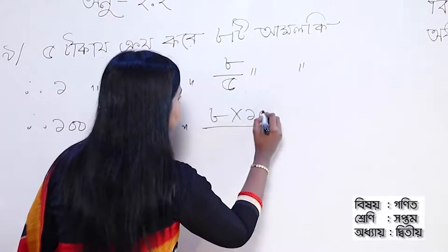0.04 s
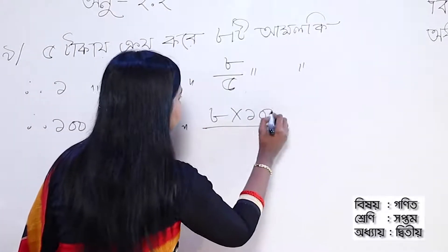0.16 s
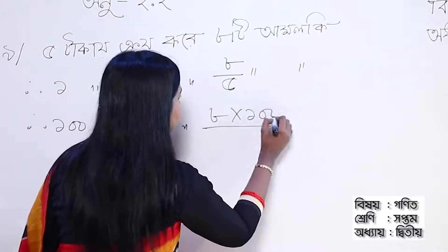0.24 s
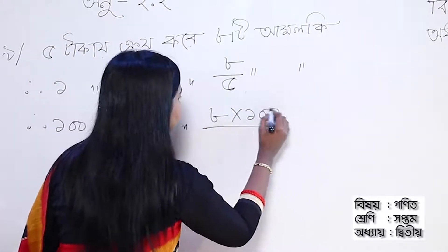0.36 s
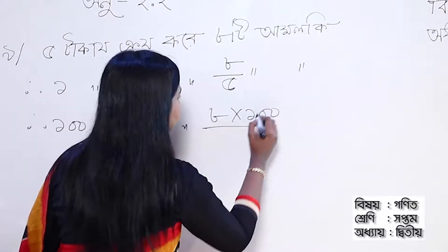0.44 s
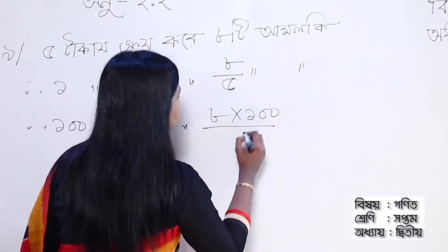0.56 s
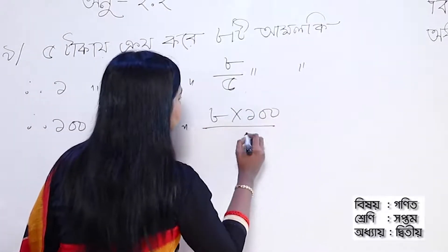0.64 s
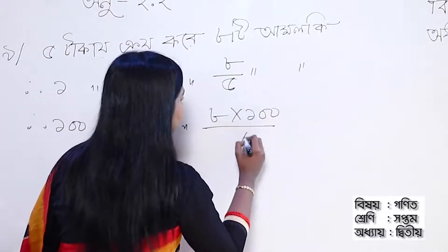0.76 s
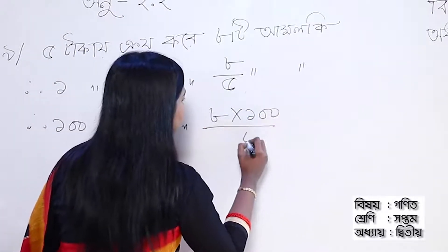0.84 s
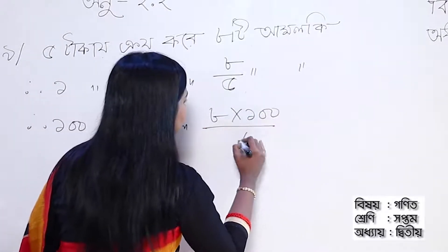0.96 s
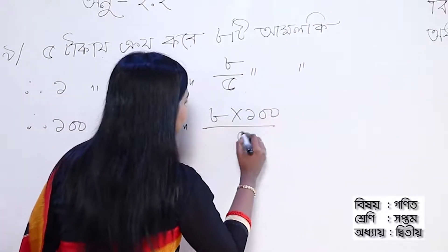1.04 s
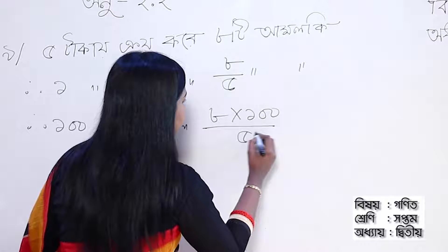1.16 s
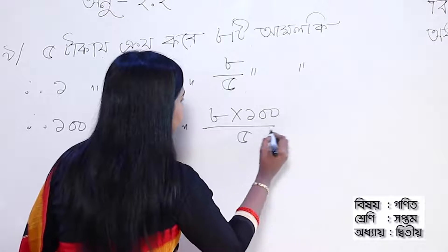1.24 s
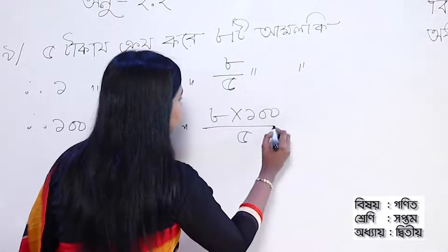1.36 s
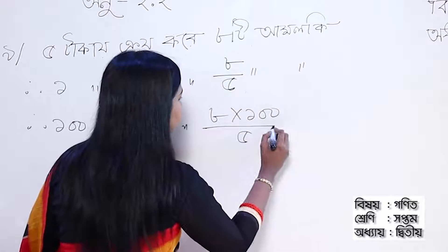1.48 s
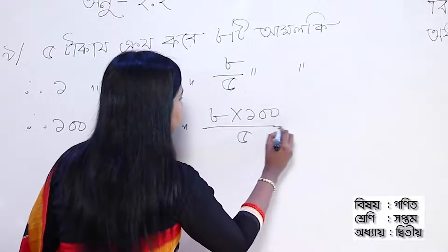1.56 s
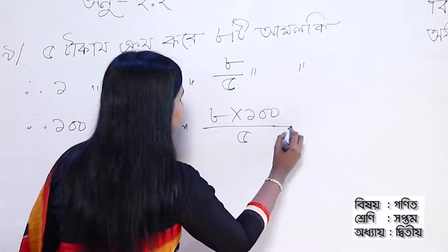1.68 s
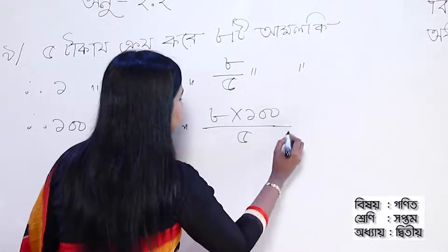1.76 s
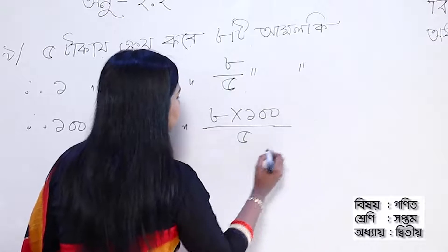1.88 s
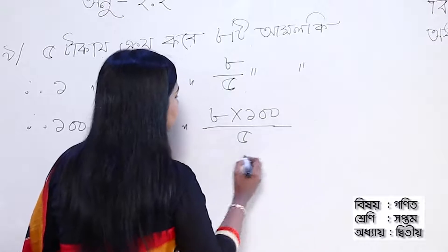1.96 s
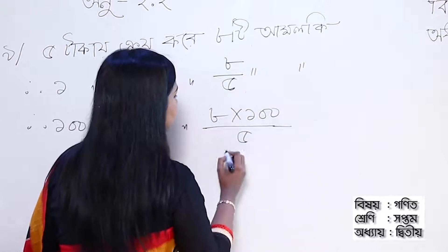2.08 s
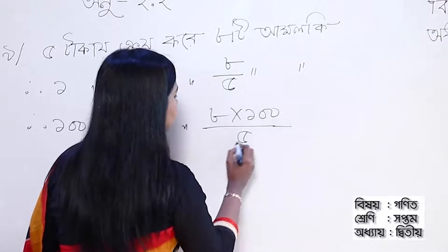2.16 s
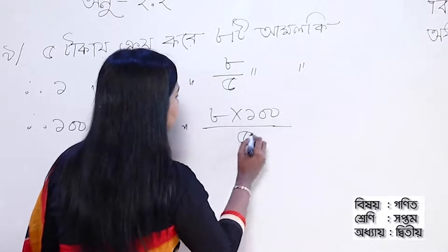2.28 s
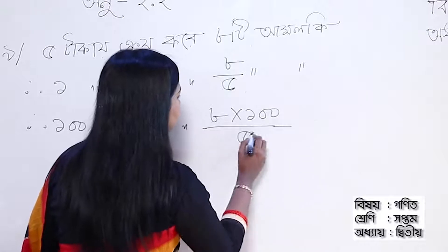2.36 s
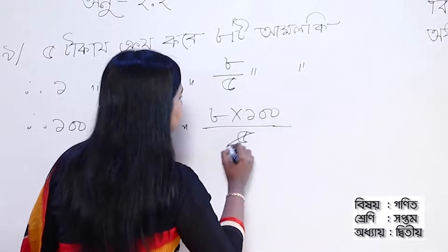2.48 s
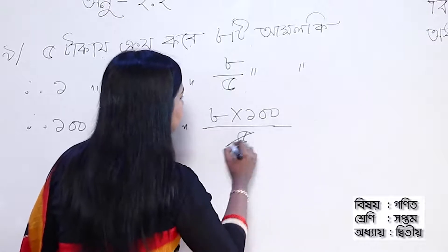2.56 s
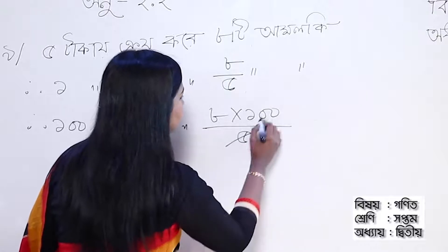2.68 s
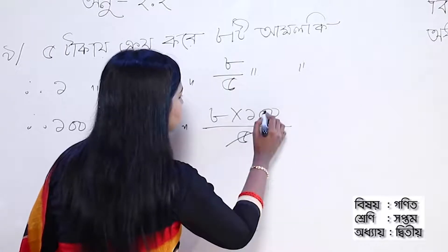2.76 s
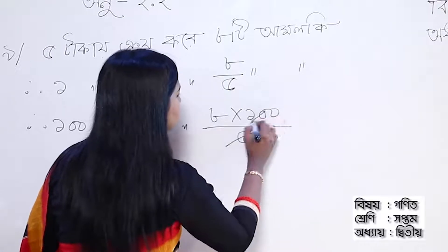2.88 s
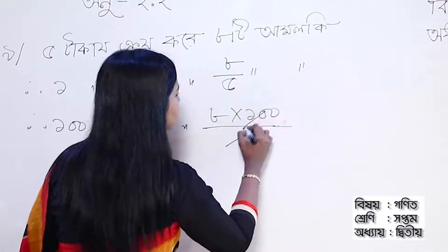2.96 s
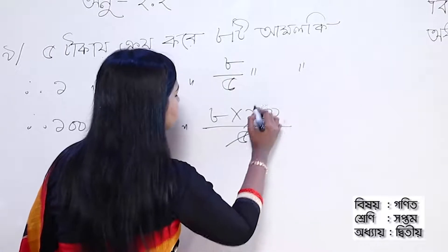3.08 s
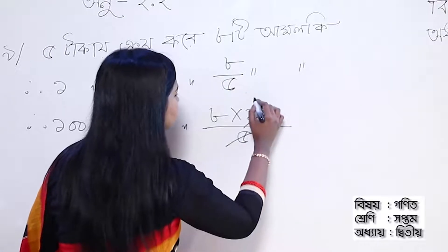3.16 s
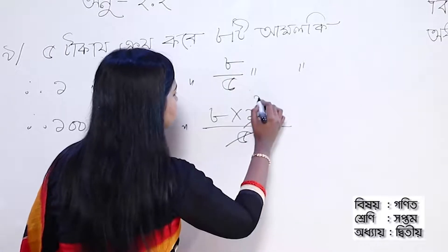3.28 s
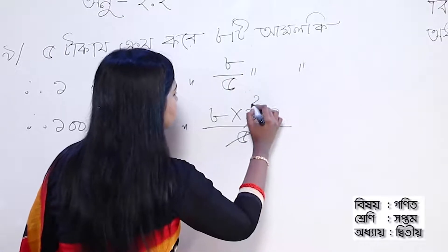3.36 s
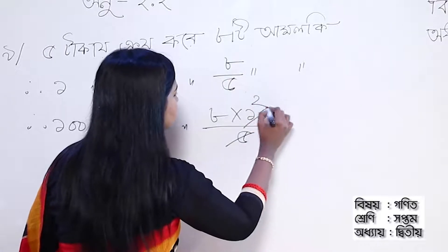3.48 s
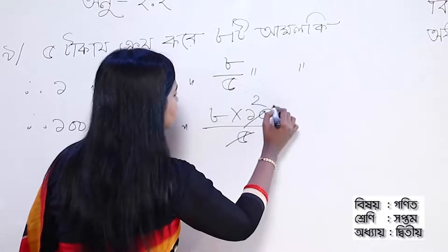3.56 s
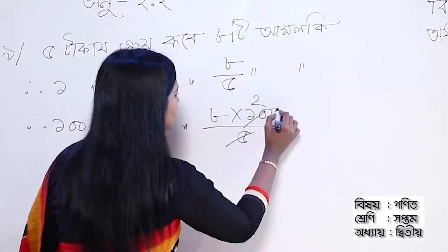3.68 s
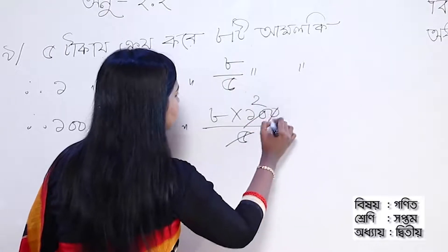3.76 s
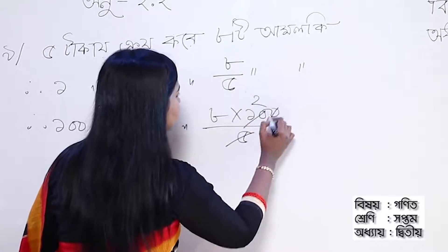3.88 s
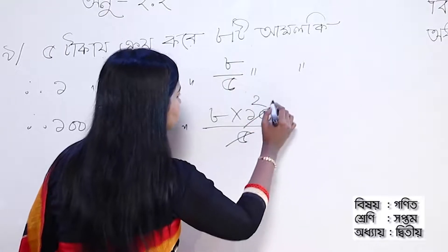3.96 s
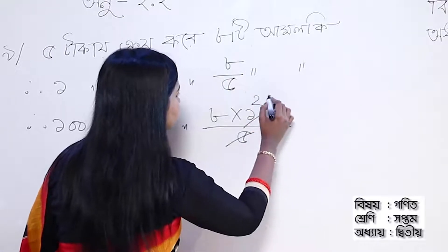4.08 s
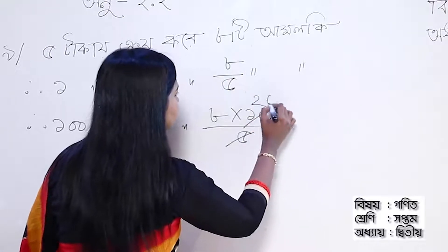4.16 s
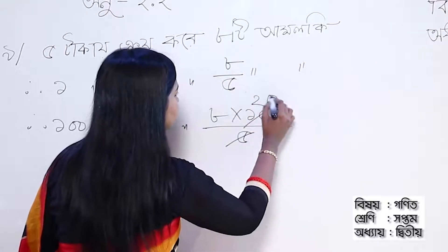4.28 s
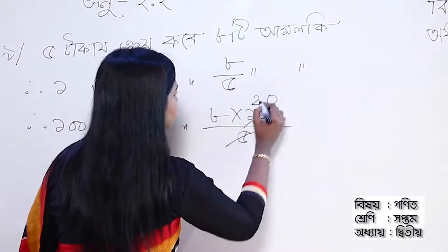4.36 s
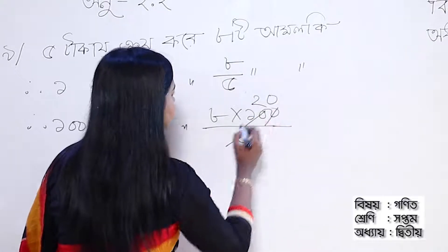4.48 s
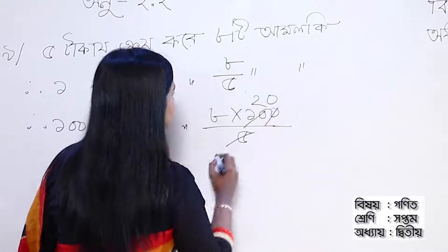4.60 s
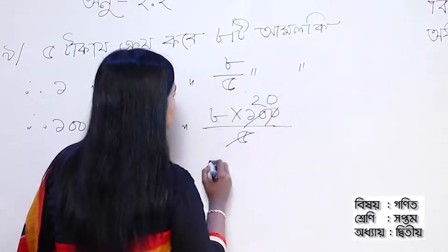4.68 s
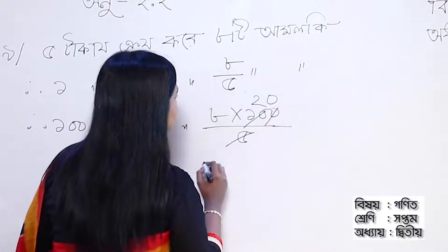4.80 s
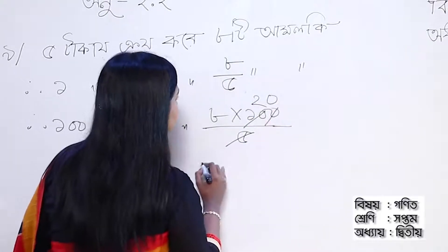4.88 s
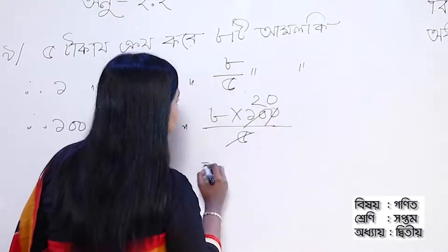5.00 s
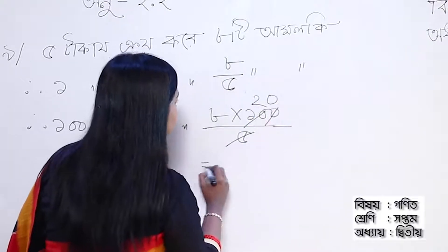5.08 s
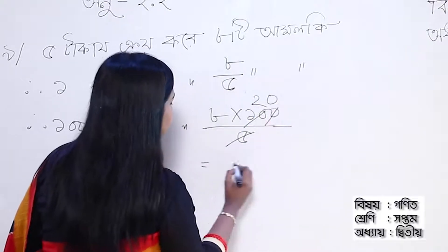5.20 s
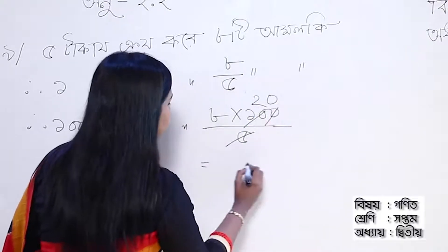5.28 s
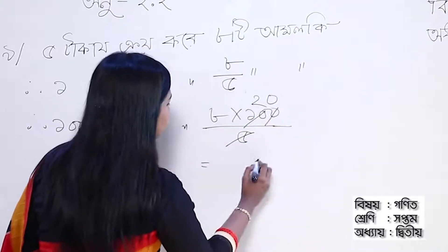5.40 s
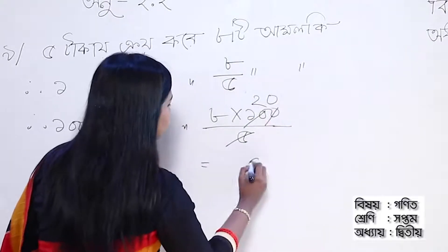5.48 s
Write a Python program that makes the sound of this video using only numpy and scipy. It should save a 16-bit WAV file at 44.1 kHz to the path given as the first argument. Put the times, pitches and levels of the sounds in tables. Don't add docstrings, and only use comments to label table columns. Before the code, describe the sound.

Close microphone, nearly mono, in a quiet room with short wall reflections. The felt nib lands with deep, woody panel thumps, irregularly spaced, and drags in brief bright hisses. Between strokes come quiet cloth rustles, tiny clicks and a few weak metallic ticks. Writing pauses around four and a half seconds, then low taps resume. Low building rumble, hiss and a barely audible electric whine continue.

```python
import sys
import numpy as np
from scipy import signal
from scipy.io import wavfile
from scipy.ndimage import uniform_filter1d

SR = 44100
rng = np.random.default_rng(int(sys.argv[2]) if len(sys.argv) > 2 else 0)


def wrap_up_sound(samples):
    columns = np.atleast_2d(samples).T
    tamed = np.clip(columns, -1, 1)
    steps = np.round(tamed * 32767).astype(np.int16)
    wavfile.write(sys.argv[1], SR, steps)


def gain_from_db(level_db):
    decades = np.asarray(level_db, float) / 20
    return 10 ** decades


N = 244089
LEAD = 4410
RISE_S = .00283

# [crest t/s, peak level/dB, panel f/Hz, knock level/dB, edge level/dB]
LANDINGS_HIGH = [(-.047, -13.5, 208, -12, -33), (0.7634, -22, 195, -34, -6.5), (.7851, -11, 195, -40, -40),
                 (1.5942, -13.5, 223, -7, -26), (2.1119, -33.5, 205, -1.5, -14), (2.2228, -28, 232, -5, -8),
                 (2.4401, -13.5, 189, -45, -24), (2.8695, -14.5, 214, -9.5, -17.5),
                 (3.3064, -4.5, 239, -4.5, -20), (3.775, -6.5, 235, -6, -21.5),
                 (4.1656, -8.5, 215, -7, -20.5)]
# [crest t/s, peak level/dB, panel f/Hz, knock level/dB, edge level/dB]
LANDINGS_LOW = [
    (4.892, -25.5, 246, -5, -6),
    (4.9662, -12, 182, -44, -43),
    (5.1713, -4.5, 200, -11, -24),
    (5.4325, -36, 224, -1, -2),
    (5.5267, -16.5, 177, -48, -42),
]
# [delay t/ms, reflection factor (negative = inverted)]
ECHOES_HIGH = [(9.5, -.18), (17.2, -.14), (25.8, -.36), (28.6, .14), (33.2, -.16), (35.6, .19), (48.9, .17),
               (56.6, .24), (64.9, .12), (72.8, .1)]
# [delay t/ms, reflection factor (negative = inverted)]
ECHOES_LOWER = [(11.2, .15), (16.3, -.1), (25.5, .16), (31.3, .1), (35.9, -.17), (48, -.1), (56.7, -.14),
                (65.8, .11), (73.4, .1), (81.9, -.08)]
# [f/Hz, level/dB, t60/s]
PANEL_MODES = [(495, -7, 0.059), (635, -1.5, 0.02), (977, 1.5, 0.016), (1820, -16.5, 0.016)]
# [f/Hz, t60/s]
ROOM_T60 = [(60, 1), (120, 0.56), (250, 0.53), (500, 0.38), (1000, 0.067), (4000, 0.43)]
# [f/Hz, level/dB, t60/s]
STANDING_WAVES = [(34.6, 3, .5), (73.8, -7, 1), (105.4, 17.5, 0.21), (148.3, 3.5, 0.49), (183, -20, 0.37),
                  (235.2, 8.5, 0.24), (294, -4.5, 0.41)]
# [start t/s, length t/s, peak hiss level/dB, place of peak/0-1, squeak against hiss level/dB]
STROKE_EVENTS = [(0, .17, -46.5, 0.72, -15), (0.136, 0.31, -50.5, 0.39, -25), (0.351, .14, -45.5, 0.5, -27),
                 (0.845, 0.15, -55, 0.7, -10), (1.006, 0.12, -48.5, 0.34, -6),
                 (1.088, 0.17, -48.5, 0.5, -8), (1.638, 0.15, -46, 0.98, -13),
                 (2.477, .175, -50.5, 0.73, -6), (2.922, 0.18, -53.5, 0.8, -7.5), (3.295, 0.22, -54, 1, -4),
                 (3.512, 0.102, -48, 0.4, -4.5), (3.8, 0.16, -50.5, 0.92, -11),
                 (4.204, 0.104, -58, 0.3, -20), (4.262, .17, -47, 0.43, -8), (5.005, 0.074, -52.5, .85, -8),
                 (5.17, 0.056, -57, .55, -10)]
# [f/Hz, level/dB per Hz]
NIB_COLOUR = [(2650, -23), (4500, -10), (5600, -32), (6900, -3), (7860, 1.5), (10500, 5.5), (12500, -4.5),
              (16000, -13)]
# [f/Hz, width/Hz, level/dB]
FIBRE_MODES = [(7720, 79, 2), (8950, 230, 10), (9850, 100, 0), (10800, 220, -8), (12320, 150, 4),
               (13600, 410, -15)]
# [f/Hz, width/Hz, level/dB]
BARREL_MODES = [(1780, 410, -17), (2910, 940, -17)]
# [f/Hz, level/dB per Hz]
AIR_COLOUR = [(12, -46), (20, -14), (65, 2), (99, 3), (271, -8.5), (646, -22), (904, -19.5), (2150, -28.5),
              (3000, -32), (4990, -35), (6900, -32.5), (10900, -28.5), (14900, -32.5), (16200, -39)]
# [f/Hz, level/dB per Hz]
BUILDING_COLOUR = [(30, -34), (60, 4), (100, 4.5), (200, -5), (400, -12), (700, -35)]
WHINE_F_HZ = (3910, 4712)
WHINE_LEVEL_DB = (-72.5, -76.5)
# [fastest moment t/s, build-up t/s, settling t/s, rustle above rest level/dB]
ARM_MOVES = [(.09, 0.11, 0.19, 6), (.44, 0.078, 0.051, 7.5), (.65, 0.05, 0.23, 3), (.88, 0.043, 0.11, 2),
             (1.05, 0.047, 0.059, 4.5), (1.14, .05, 0.055, 8), (1.4, .04, 0.06, 3.5), (1.7, .05, 0.071, -2),
             (2.03, 0.086, 0.38, 6), (2.83, 0.1, 0.11, 5.5), (3.05, 0.13, .1, 3.5),
             (3.22, 0.037, 0.17, 5.5), (3.57, 0.06, 0.035, 0.5), (3.95, 0.16, .05, 0.5),
             (4.1, 0.088, .13, 4), (4.39, 0.082, 0.036, 4), (4.69, .22, 0.15, 10)]
# [f/Hz, level/dB per Hz]
CLOTH_COLOUR = [(710, -28), (1200, -3.5), (2060, -2), (3100, 0.5), (4300, -5), (5600, -2), (7200, -9),
                (15600, -15), (17000, -120)]
# [f/Hz, level/dB per Hz]
SOFT_CLOTH_COLOUR = [(90, -21), (250, 2), (600, -3.5), (1200, -8), (1700, -35), (3000, -58)]
# [t/s, peak level/dB, f/Hz, t60/s]
BRIGHT_SNAPS = [(0.762, -36, 10000, 0.0029), (.785, -47, 9500, .05), (.9457, -38, 9300, .012),
                (1.1224, -37, 10800, 0.0083), (1.6614, -38, 9100, 0.017), (1.8218, -46, 9400, 0.013),
                (2.438, -41, 9400, 0.02), (2.6808, -38.5, 10100, 0.043), (2.6934, -40, 10200, 0.01),
                (2.8724, -39, 9600, 0.04), (3.1737, -47, 13400, 0.012), (3.7713, -47, 7960, 0.015),
                (3.935, -45, 8520, 0.012), (3.9765, -36, 11500, 0.02), (4.1637, -40.5, 9190, 0.044),
                (5.195, -42, 11500, 0.012), (5.3258, -44, 6150, 0.011)]
# [t/s, peak level/dB, f/Hz, t60/s]
DULL_SNAPS = [(0.7617, -51, 1320, 0.019), (0.946, -46.5, 1630, 0.014), (1.0485, -45, 1560, 0.09),
              (2.039, -52, 1730, 0.015), (2.109, -43.5, 1270, 0.0094), (2.2184, -52, 1300, 0.015),
              (2.2284, -49, 1220, 0.014), (2.389, -47.5, 3300, 0.016), (2.6803, -49, 1550, 0.018),
              (3.163, -46.5, 1170, 0.016), (3.5235, -44.5, 1560, 0.015), (3.978, -44, 1210, 0.015),
              (4.389, -45, 2910, 0.017), (4.59, -42.5, 2930, 0.015), (4.682, -41.5, 3400, 0.025),
              (4.7526, -46, 3010, 0.015), (4.83, -43, 2900, 0.011), (4.9088, -40, 890, 0.017),
              (5.429, -38, 500, 0.025),
    (2.1, -42, 680, 0.016),
]
# [t/s, peak level/dB, f/Hz, t60/s]
BANGLE_PINGS = [
    (.872, -46, 1730, .08),
    (2.8376, -40.5, 1800, .035),
    (2.838, -48, 5800, .012),
    (.864, -45, 850, .04),
    (2.2184, -45, 750, .04),
]
# [f/Hz, level/dB]
SIDE_LEVEL = [(100, -75), (170, -64), (380, -41), (950, -30.5), (2380, -25.5), (5980, -23.5),
              (15000, -28.5)]


def evened(x):
    return x / np.sqrt(np.mean(x ** 2) + 1e-20)


def read(points, hz):
    f, value = np.transpose(points)
    return np.interp(np.log(hz + 1), np.log(f + 1), value)


def add(mix, s, sound):
    part = mix[round(s * SR):][:len(sound)]
    part += sound[:len(part)]


def resonate(x, hz, width_hz):
    turn = np.exp(2j * np.pi * np.cumsum(hz * np.ones(len(x))) / SR)
    r = np.exp(-np.pi * width_hz / SR)
    return 2 * (turn * signal.lfilter([1 - r], [1, -r], x * turn.conj() + 1e-18)).real


def resonate_twice(x, hz, width_hz):
    return resonate(resonate(x, hz, width_hz), hz, width_hz)


def noise(points, patchy_db, size=512, wide=5, long=12):
    frames = 4 * N // size + 5
    hz = np.fft.rfftfreq(size, 1 / SR)
    a, b, patches = rng.standard_normal((frames, len(hz), 3)).T
    patches = uniform_filter1d(patches, wide, 0)
    patches = evened(uniform_filter1d(patches, long, 1))
    z = (a + 1j * b) * gain_from_db(read(points, hz)[:, None] + patchy_db * patches)
    return evened(signal.istft(z, nperseg=size, noverlap=3 * size // 4)[1][:N])


def grip(depth_db, ms, slips_per_s, slip_db):
    wobble = uniform_filter1d(rng.standard_normal(N), int(ms * SR / 1000))
    uneven = gain_from_db(depth_db * evened(wobble))
    slips = gain_from_db(slip_db + 5 * np.minimum(rng.exponential(1, N), 3))
    slips = slips * (rng.random(N) < slips_per_s / SR)
    build_up = np.exp(-np.arange(300)[::-1] / SR / .00066)
    return evened(uneven + signal.oaconvolve(slips, build_up)[:N])


def drift(ms, depth_db):
    slow = evened(uniform_filter1d(rng.standard_normal(400), max(int(ms / 14), 1)))
    return gain_from_db(depth_db * np.interp(np.arange(N), np.linspace(0, N, 400), slow))


def thump(db, hz, knock_db, edge_db):
    t = np.arange(LEAD) / SR
    damping = (hz - 144.5) / 11.9 + .029 * knock_db
    from_crest_s = t - RISE_S
    cycles = hz * from_crest_s + .065 * (1 - np.exp(-from_crest_s / .00143))
    swell = (t / .00353 * np.exp(1 - t / .00353)) ** damping
    push = swell * np.cos(2 * np.pi * cycles)

    spread_s = 1e-5 + 1e-5 * max(-15 - knock_db, 0)
    cushion = np.exp(-.5 * (np.arange(-99, 100) / SR / spread_s) ** 2)
    push = np.convolve(push, cushion / cushion.sum(), "same")

    ring = gain_from_db(-60 * t / .046) * np.sin(2 * np.pi * 395 * t)
    felt = gain_from_db(-1.5 - 60 * t / .0092) * np.sin(2 * np.pi * 555 * t)
    knock = gain_from_db(knock_db) * (ring - felt) * (1 - np.exp(-t / .0006))

    late_s = t - .0008
    edge = sum(gain_from_db(edge_db + d - 60 * t / t60) * np.sin(2 * np.pi * f * late_s) for f, d, t60 in PANEL_MODES)
    edge = edge * (1 - np.exp(-(np.maximum(late_s, 0) / .00075) ** 2))
    return gain_from_db(db) * (push - knock - edge)


def room(x):
    reflections, t = np.zeros(SR), np.arange(SR) / SR
    at = np.arange(400, SR - 20, 20)
    reflections[at + rng.integers(0, 20, len(at))] = rng.choice([-1., 1.], len(at))
    hz, frame_s, z = signal.stft(reflections, SR, nperseg=1024)
    z = z * gain_from_db(-60 * frame_s / read(ROOM_T60, hz)[:, None])
    tail = signal.istft(z, SR, nperseg=1024)[1][:SR]
    tail *= 1 - np.exp(-(t / .076) ** 2)
    boom = sum(gain_from_db(db - 60 * t / t60) * np.cos(2 * np.pi * f * t) for f, db, t60 in STANDING_WAVES)
    boom = boom * (1 - np.exp(-(t / .17) ** 2))
    response = gain_from_db(-16.5) * tail / np.linalg.norm(tail) + gain_from_db(-53.5) * boom
    return signal.fftconvolve(x, response)[:len(x)]


def landings():
    direct, walls = np.zeros((2, N + LEAD))
    for table, echoes in ((LANDINGS_HIGH, ECHOES_HIGH), (LANDINGS_LOW, ECHOES_LOWER)):
        for s, *row in table:
            sound = thump(*row)
            at_s = s - RISE_S + LEAD / SR
            add(direct, at_s, sound)
            for ms, factor in echoes:
                add(walls, at_s + ms / 1000, factor * sound)
    dull = signal.lfilter([.08], [1, -.92], walls)
    return (direct + dull + room(direct))[LEAD:]


def stroke(length_s, db, peak):
    t = np.arange(round(length_s * SR)) / SR
    late = 2 * (t - np.clip(peak, 0, 1) * length_s)
    touch_lift = np.clip(np.minimum(t / .035, (length_s - t) / .028), 0, 1)
    edges = np.sin(np.pi / 2 * touch_lift) ** 2
    slow_db = np.where(late < 0, 20 * late, -22 * late)
    return edges * gain_from_db(db + slow_db), t / length_s


def strokes():
    speed, squeal, top_db, bend = np.zeros((4, N))
    for s, length_s, db, peak, squeak_db in STROKE_EVENTS:
        gain, done = stroke(length_s, db, peak)
        add(speed, s, gain)
        add(squeal, s, gain * gain_from_db(squeak_db - 6 + 5.5 * done))
        add(top_db, s, 6 * np.sin(np.pi * done) - 2 * done)
        add(bend, s, .044 * (.5 - done))

    grit = rng.standard_normal(N) * grip(.92, .53, 90, 2.7)
    squeak = evened(resonate_twice(grit, 6570, 900))
    modes = sum(gain_from_db(db) * drift(45, 4.4) * evened(resonate(grit, f * (1 + bend), width))
                for f, width, db in FIBRE_MODES)
    hiss = noise(NIB_COLOUR, 4, size=256, wide=4, long=36) * grip(.32, 1, 82, 1.1)
    rub = evened(hiss + gain_from_db(-8.5) * evened(modes))
    rub = rub + (gain_from_db(top_db) - 1) * resonate_twice(rub, 14600, 4800)
    rub = rub + sum(gain_from_db(db) * drift(60, .95) * evened(resonate_twice(grit, f, width))
                    for f, width, db in BARREL_MODES)
    return speed * rub + squeal * squeak


def arm():
    t = np.arange(N) / SR
    moves = [db * np.interp(t, [s - rise, s, s + fall], [0, 1, 0]) for s, rise, fall, db in ARM_MOVES]
    return np.max(moves, axis=0)


def air():
    t = np.arange(N) / SR
    whine = sum(gain_from_db(db) * drift(90, 2) * np.sin(2 * np.pi * hz * t)
                for hz, db in zip(WHINE_F_HZ, WHINE_LEVEL_DB))
    swell_db = -56.5 + 2.03 * t + .29 * arm()
    rumble = gain_from_db(swell_db) * noise(BUILDING_COLOUR, 3.03, size=2048, wide=7, long=5)
    hiss = gain_from_db(-47.5) * noise(AIR_COLOUR, 1.4, size=2048, wide=9, long=3)
    return hiss + rumble + whine


def sleeve():
    low = noise(SOFT_CLOTH_COLOUR, 1.5)
    rustle = noise(CLOTH_COLOUR, 1.56) * grip(1.4, 3.5, 25, -4)
    motion = gain_from_db(arm()) - .43
    return gain_from_db(-59) * motion * (rustle + gain_from_db(.74) * low)


def snaps():
    out, t = np.zeros(N), np.arange(2048) / SR
    onset = 1 - np.exp(-(t / .0024) ** 2)
    for s, db, hz, t60 in BRIGHT_SNAPS + DULL_SNAPS:
        puff = resonate_twice(rng.standard_normal(len(t)), hz, .64 * hz)
        snap = puff * gain_from_db(-60 * t / t60) * onset
        add(out, s - .001, gain_from_db(db) * snap / abs(snap).max())
    return out


def pings():
    out, t = np.zeros(N), np.arange(4096) / SR
    onset = 1 - np.exp(-t / .0016)
    for s, db, hz, t60 in BANGLE_PINGS:
        add(out, s, gain_from_db(db - 60 * t / t60) * np.sin(2 * np.pi * hz * t) * onset)
    return out


def scene():
    centre = landings() + strokes() + air() + sleeve() + snaps() + pings()
    hz, _, z = signal.stft(centre, SR, nperseg=512)
    scramble = np.exp(2j * np.pi * rng.random(z.shape))
    z = z * gain_from_db(read(SIDE_LEVEL, hz)[:, None] + 6.5) * scramble
    side = signal.istft(z, SR, nperseg=512)[1][:N]
    return np.array([centre + side, centre - side])


def low_pass(x):
    return signal.sosfilt(signal.butter(12, 16530, fs=SR, output="sos"), x)


def record(dry):
    lowpass = signal.firwin(511, 15900, window=("kaiser", 9), fs=SR)
    mix = signal.oaconvolve(dry, lowpass[None], "same")
    return low_pass(mix)


dry = scene()
out = record(dry)
wrap_up_sound(out)
```